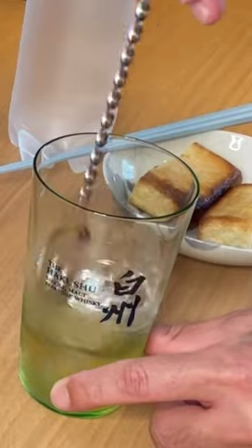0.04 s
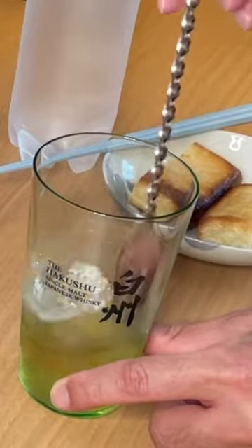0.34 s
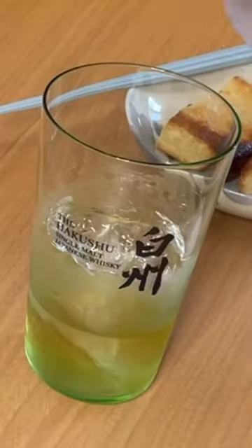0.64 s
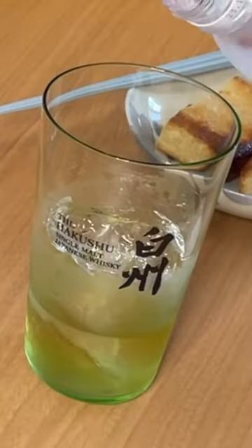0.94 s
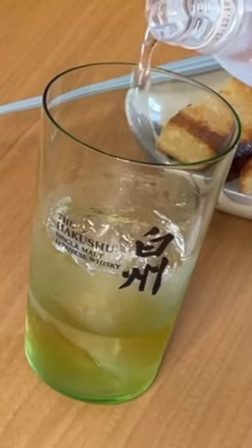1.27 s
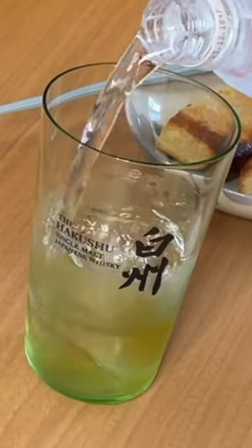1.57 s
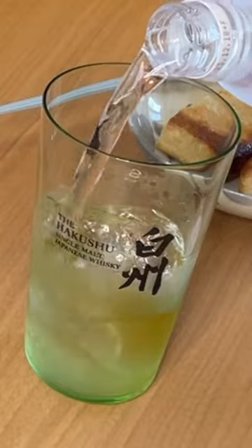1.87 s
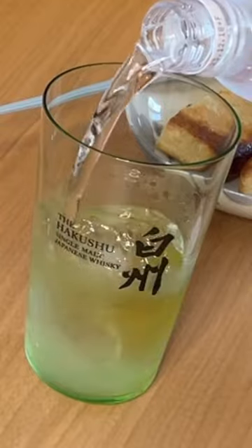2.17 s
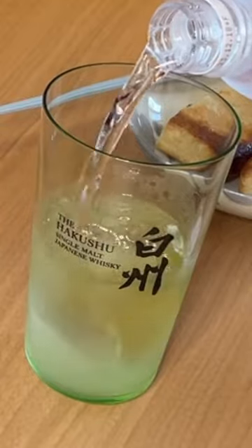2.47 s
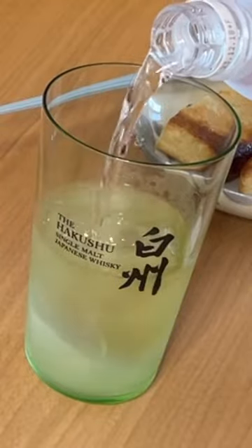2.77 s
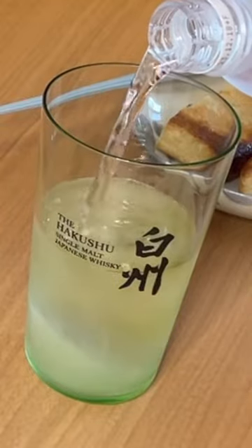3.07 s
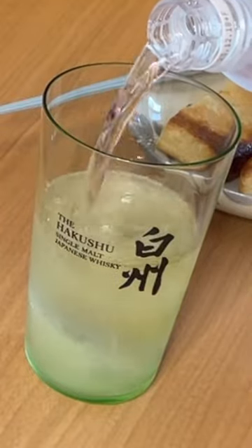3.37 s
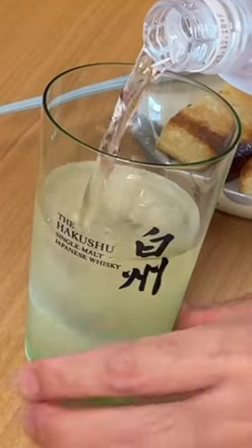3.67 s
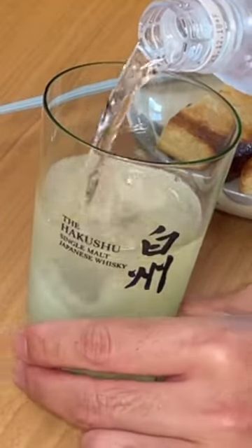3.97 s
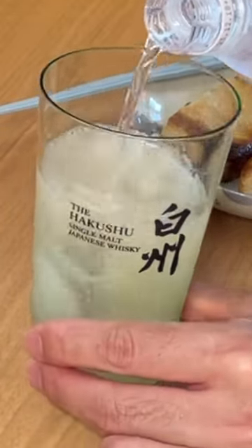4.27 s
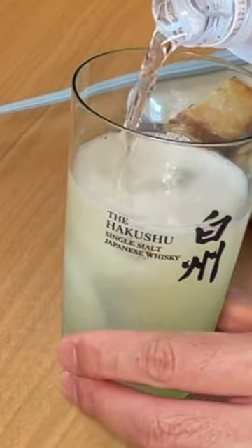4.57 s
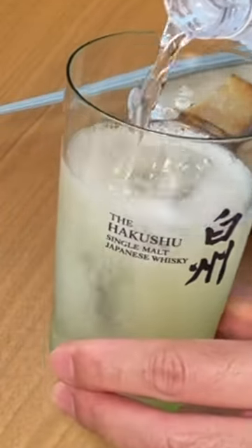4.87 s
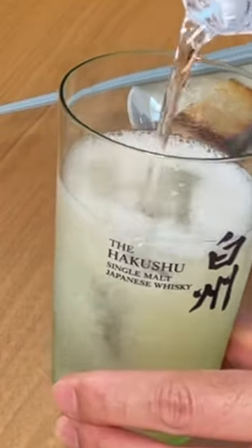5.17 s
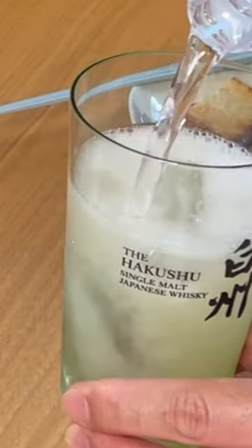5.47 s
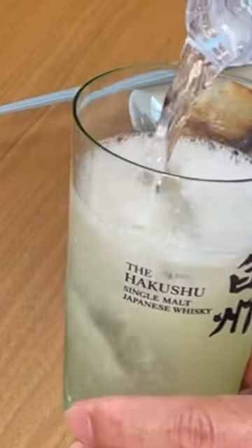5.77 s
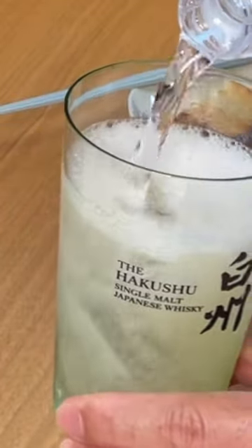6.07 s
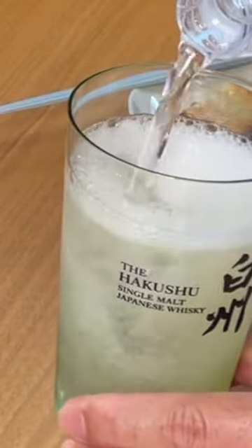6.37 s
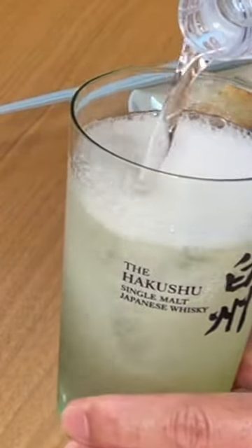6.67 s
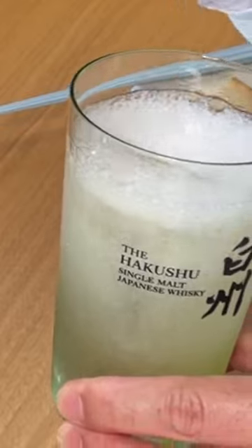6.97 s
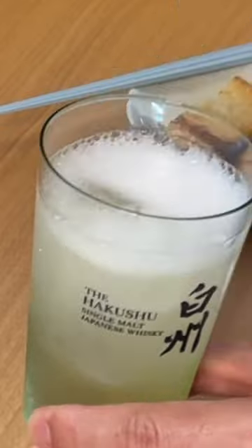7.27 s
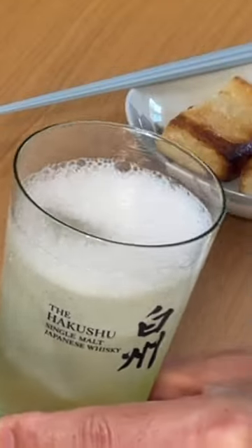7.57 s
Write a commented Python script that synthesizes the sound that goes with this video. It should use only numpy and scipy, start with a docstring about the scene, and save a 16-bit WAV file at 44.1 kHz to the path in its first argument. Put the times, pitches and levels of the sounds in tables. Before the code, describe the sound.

A spoon briefly stirs ice in a glass, then sparkling water pours over crackling, knocking cubes and fizzes before the glass bumps a table.

```python
"""Sparkling water over ice

A bar spoon stirs ice in a tall glass on a wooden table; the stirring is cut off after half a second.
Sparkling water is poured in: droplets trap ringing bubbles, the ice crackles, floats up and knocks on
the wall, and bursting bubbles build a fizzing head of foam. At the end the glass bumps on the table.
A small room, heard closely through two microphone ports."""
import sys
import numpy as np
from scipy import signal
from scipy.fft import rfft, irfft, next_fast_len
from scipy.io import wavfile

SR = 44100
rng = np.random.default_rng(int(sys.argv[2]) if len(sys.argv) > 2 else 0)


def unload_audio(sound):
    """Save the sound as a 16-bit wav file, at the path given as the first command line argument."""
    columns = np.transpose(np.atleast_2d(sound))
    # keep every value between -1 and 1, then stretch to whole-number steps
    steps = np.round(np.clip(columns, -1, 1) * 32767)
    wavfile.write(sys.argv[1], SR, steps.astype(np.int16))


N = 344862
TIME = np.arange(N) / SR
STIR_END_S, POUR_S, POUR_END_S, FLOAT_S = 0.4596, 1.255, 7.0, 4.205  # main cues


# Bright sheen of the spray: (frequency [Hz], relative level [dB])
SPRAY_SPECTRUM = [(3000, -35), (7000, -13), (8200, -2.5), (9300, -3), (11000, -2.5), (12700, -4),
                  (14500, 1), (15600, -2), (16200, -12)]


def fizz():
    """Tiny bursting bubbles throw a bright, sputtering spray and merge into the hiss of foam."""
    spray_gain, foam_gain, per_s = carbonation()
    clusters = coloured(rng.standard_normal(N), [(3, 0), (30, 0), (120, -40), (1000, -100)])
    sputter = amp(clusters * 1.1 * (300 / np.maximum(per_s, 300)) ** 0.39)  # smoother as bursts crowd
    spray = sputter * coloured(grains(per_s, spread_db=0), SPRAY_SPECTRUM)
    return spray_gain * spray + foam_gain * foam(per_s) + pops()


def carbonation():
    """Spray gain, foam gain and bursts a second: the drink settles, the pour frees gas, a head grows."""
    spray_s, head_s, head_grow_s = 2.91, 3.5, 0.83
    flow, gush = stream()
    settling = amp(-86 - 17.5 * since(STIR_END_S))
    bed = np.hypot(settling, flow * amp(-85 + 12.5 * gush))
    spray = ramp(spray_s, length_s=0.76) ** 2 * amp(-67 - 0.5 * since(spray_s))
    head = 1 - np.exp(-since(head_s) / head_grow_s)
    per_s = 400 + 300 * flow + 16000 * head
    return np.hypot(bed, spray), np.hypot(amp(-4.5) * bed, amp(-68) * np.sqrt(head)), per_s


# Body of the foam's hiss: (frequency [Hz], relative level [dB])
FOAM_SPECTRUM = [(500, -12), (1150, -1), (1500, 7), (2000, 2.5), (2400, 2), (2700, -1.5), (4600, -6),
                 (6200, -4), (7500, -2), (8300, 1), (12000, -10), (16000, -20)]
# Two resonances of the air over the foam, sinking as the head thickens and rising as it settles:
# (time [s], lower pitch [Hz], clarity [0-1])
AIR_RING = [(3.3, 3400, 0.05), (4.1, 3484, 0.5), (4.35, 3485, 0.92), (4.65, 3380, 1), (4.95, 3260, 0.8),
            (5.2, 3110, 0.22), (6.2, 3040, 0.28), (6.9, 3086, 0.2), (7.35, 3304, 0.35), (7.8, 3470, 0.3)]
# A ring that emerges with the thick head, sinks, and swells after the pour:
# (time [s], pitch [Hz], relative level [dB])
HEAD_RING_SWEEP = [(4.5, 4700, -25), (5.0, 4410, -7.5), (5.5, 4200, -7), (6.1, 4084, -5), (6.9, 3950, -3.5),
                   (7.15, 3920, -5.5), (7.4, 3770, 1), (7.8, 3690, -2)]


def foam(per_s):
    """Crowded bursts hiss and ring the air over the foam and the full glass."""
    air_hz, clarity = curves(AIR_RING)
    head_hz, head_db = curves(HEAD_RING_SWEEP)
    bursts = grains(per_s, spread_db=-3.5)
    lower = resonate(bursts, air_hz, width_hz=155)
    upper = resonate(bursts, air_hz * 1.55, width_hz=670)
    air = amp(-5.5) * clarity * (lower + amp(1.5) * clarity * upper)
    head = amp(head_db - 6.5) * resonate(bursts, head_hz, width_hz=370)
    wall = amp(-12.5) * resonate(grains(per_s, spread_db=-2), hz=5200, width_hz=320)
    hollow = amp(-14.5) * ramp(FLOAT_S, length_s=0.36) * resonate(bursts, hz=1600, width_hz=170)
    hiss = coloured(grains(per_s, spread_db=3.5), FOAM_SPECTRUM)
    return amp(-2.5 * clarity) * hiss + air + head + wall + hollow  # hiss ducks as the air rings


# The largest bubbles snapping, and at 2.7333 s the bright snap of the loud ice crack: (time [s], relative level
# [dB])
BIG_POPS = [(.632, -66.5), (.8984, -65.5), (.9866, -63.5), (1.3037, -62.5), (1.372, -60), (1.4025, -64.5),
            (1.4305, -54.5), (1.4963, -64), (1.5917, -57.5), (1.6917, -66), (1.852, -61), (1.9684, -60.5),
            (2.2979, -66), (2.3503, -64.5), (2.4383, -61), (2.5399, -63.5), (2.5865, -62), (2.7333, -46.5),
            (2.8363, -55.5), (3.0615, -65), (3.2428, -77), (3.3496, -69), (3.433, -64), (3.4818, -63.5),
            (3.6801, -61), (3.8558, -55.5), (4.0756, -62.5), (5.6692, -58), (5.7467, -59), (6.256, -59.5)]
# Short ring of a snap: (frequency [Hz], relative level [dB], T60 [s])
SNAP_MODES = [(8700, -5, 0.018), (11400, -13, 0.014), (15000, 3.5, 0.016)]


def pops():
    """Large bubbles snap on cue, along with the bright top of the loud crack at 2.73 s; lesser ones at random."""
    times = TIME[rng.random(N) < 4.6 / SR]  # about 4.6 a second
    small_pops = list(zip(times, rng.normal(-68, 3.5, len(times))))
    return blows(BIG_POPS + small_pops, SNAP_MODES, edges_hz=(9500, 16000), detune=0.0685, uneven_db=4,
                 chatter_t60=0.0001, noise_db=1, noise_t60=0.037, trim_db=-3.5)


def stream():
    """How much water is falling (0-1), and its first gush, which dies away."""
    fade_s, gush_s = 0.23, 0.28
    flow = ramp(POUR_S, fade_s) * (1 - ramp(POUR_END_S, fade_s))
    return flow, np.exp(-since(POUR_S + fade_s) / gush_s)


def splash():
    """Until the ice floats, droplets hit it in gurgling clusters and trap small, chirping bubbles."""
    droplets_per_s, pitches, decay_cycles = 800, 40, 4
    flow, gush = stream()
    gurgle = coloured(rng.standard_normal(N), [(10, 0), (100, -100)])
    t, out = TIME[:SR // 30], np.zeros(N)
    lands = rng.random(N) < droplets_per_s / SR
    pitch_index = rng.integers(0, pitches, N)
    sizes = amp(3 * np.minimum(rng.exponential(1, N), 3) + 9 * np.minimum(gurgle, 2))
    for k, hz in enumerate(np.geomspace(2200, 10000, pitches)):
        age = hz * t / decay_cycles
        envelope = np.exp(-age) * (1 - np.exp(-5 * age))
        bubble = envelope * np.sin(2 * np.pi * hz * t * (1 + 0.0092 * age))
        for index in np.flatnonzero(lands & (pitch_index == k)):
            add(out, index / SR, sizes[index] * bubble * (hz / 5000) ** 1.3)
    return flow * (1 - afloat()) * amp(-83.5 - 4 * gush) * unit(out)


# Plinks in the pour: ringing bubbles and, near 4.7 kHz, the glass ticked by ice:
# (time [s], relative level [dB], pitch [Hz])
POUR_PLINKS = [(1.524, -65, 4720), (1.653, -57.5, 4670), (1.7307, -66.5, 6180), (1.8096, -57, 2620),
               (1.885, -56.5, 5240), (1.9181, -57.5, 2510), (1.9325, -56.5, 2518), (1.9813, -69, 4680),
               (2.0607, -67.5, 2250), (2.135, -65, 2610), (2.1622, -62.5, 2790), (2.3923, -67.5, 2230),
               (2.5027, -62.5, 4700), (2.531, -58.5, 5310), (2.584, -59, 3223), (2.6297, -59.5, 2940),
               (2.7024, -55, 5320), (3.153, -67.5, 3340), (3.3138, -62, 4240), (3.3668, -64, 3400),
               (3.4695, -62, 3290)]


def plinks():
    """A bubble or the ticked glass rings briefly, rising a little, inside a soft swarm of tiny rings."""
    t, out = TIME[:SR // 12], np.zeros(N)
    for s, db, hz in POUR_PLINKS:
        ring = np.sin(2 * np.pi * hz * t * (1 + 0.69 * t)) * decay(t, t60=0.03)
        swarm = flurry(hz, octaves=0.32, length_s=0.038, fade_db=-13.5, cycles=6.6)
        add(out, s, amp(db - 2) * np.tanh(t / 0.001) * ring)
        add(out, s - 0.004, amp(db - 12.5) * np.tanh(t / 0.0058) * swarm)
    return out


# Cubes hitting the wall and each other: (time [s], relative level [dB], clack over body [dB])
ICE_KNOCKS = [(0.0141, -33, -33), (0.053, -32, -8), (0.066, -31.5, -26), (0.132, -35, -20),
              (0.1397, -31, -5), (0.1672, -36, -4), (0.1814, -32.5, -10), (0.2134, -34.5, -4),
              (.24, -35, -15), (0.2587, -32.5, -5.5), (.3059, -24.5, -1), (0.3229, -39.5, 8),
              (0.3698, -43, 10), (0.3963, -33.5, -5), (2.541, -66, -19), (2.6147, -58, -13.5),
              (2.7263, -51.5, -7), (2.788, -61.5, -15), (2.7955, -53.5, -27), (3.4007, -61.5, -23),
              (3.425, -65, -21.5), (3.6962, -60, -22), (3.7657, -64, -20), (3.8213, -50, -18.5),
              (3.8591, -62.5, -20), (3.8777, -65, -24.5), (3.9449, -65, -17), (3.9807, -64, -13),
              (4.1068, -59, -19.5), (4.167, -48, -8), (4.194, -55, -20), (4.2233, -50, -21),
              (4.2796, -49.5, -29), (4.297, -53, -17), (4.3443, -45, -13), (4.4477, -57.5, -16),
              (4.521, -62, -13), (4.575, -46.5, -6.5), (4.586, -54, -3.5), (4.6198, -54, -18),
              (4.662, -50.5, -6), (4.7745, -50, -18), (4.809, -59, -18.5), (4.976, -55.5, -13),
              (5.0049, -50.5, -19), (5.2878, -59.5, -17.5), (5.3621, -54, -3.5), (5.438, -61, -14.5),
              (5.4573, -55.5, -20.5), (5.4852, -49, -15.5), (5.633, -59, -25.5), (5.735, -54, -21.5),
              (5.9936, -53.5, -8.5), (6.2053, -40, -19), (6.3336, -51, -18.5), (6.3535, -51, -23),
              (6.3843, -54.5, -19), (6.617, -57, -24.5), (6.8017, -48.5, -13.5), (7.2017, -58, -11),
              (7.5065, -49.5, -11)]
# Damped ring of ice against the filled glass: (frequency [Hz], relative level [dB], T60 [s])
ICE_MODES = [(300, -9, 0.055), (563.8, -5, 0.04), (772, -1, 0.033), (979.4, -0.5, 0.033), (1153, -1, 0.026),
             (1430, 7, 0.025), (1550, 1, 0.02), (1760, -6, 0.022), (2214, -8.5, 0.024), (2730, -9, 0.022),
             (3240, -14, 0.02)]


def knocks():
    """Stirred cubes clack in the low drink; in the pour they boom on the bottom, then thin out afloat."""
    rebounds = [(s + 0.018 * rng.uniform(0.5, 1.5), db - 15, clack) for s, db, clack in ICE_KNOCKS]
    s, db, clack_db = np.transpose(ICE_KNOCKS + rebounds)
    stirred = s < STIR_END_S
    floating_db = -3 - 3 * since(FLOAT_S, s)
    boom_db = np.where(stirred, -2, 8 * (1 - afloat(s)) + floating_db * afloat(s))
    snap_db = np.where(stirred, -17.5, -10)
    edges_hz = (230, 1100, 2000, 3400, 7000)  # boom, body, clack, snap
    hits = np.column_stack([s, db + boom_db, db, db + clack_db, db + clack_db + snap_db])
    # a knock rings the low drink's resonances, brighter than churning does
    shallow_modes = [(hz, level + 3.5 * np.log2(hz / 1000), 0.73 * np.log(1000) / (np.pi * width))
                     for hz, width, level in DRINK_RESONANCES]
    clacks = blows(hits[stirred], shallow_modes, edges_hz, detune=0.03, uneven_db=4.5,
                   chatter_t60=0.001, noise_db=-4, noise_t60=0.025, trim_db=-3, rise_s=0.0011)
    clunks = blows(hits[~stirred], ICE_MODES, edges_hz, detune=0.035, uneven_db=4,
                   chatter_t60=0.00078, noise_db=-4.5, noise_t60=0.048, trim_db=-3, rise_s=0.0007)
    return clacks + clunks


def afloat(s=TIME, lift_s=0.36):
    """0 while the cubes rest on the bottom, 1 once they float."""
    return ramp(FLOAT_S - lift_s / 2, lift_s, s)


# Ice splitting under spoon and stream: (time [s], relative level [dB], pitch [Hz], spread [octaves])
ICE_CRACKS = [(0.141, -38, 3520, .25), (.205, -42, 3960, .2), (0.215, -41, 4340, .3), (.272, -37, 4390, .3),
              (0.3699, -37, 3314, .4), (0.404, -39, 3100, .4), (1.43, -58.5, 4894, 0.11),
              (1.5033, -64, 7020, 0.62), (1.567, -45.5, 4900, .13), (1.567, -57, 8000, .3),
              (1.584, -55.5, 4610, 0.18), (1.6, -62, 5370, 0.51), (1.69, -60.5, 7800, 0.34),
              (1.8104, -60, 5610, 0.37), (1.9328, -63.5, 4520, 0.64), (2.733, -51, 6800, .9),
              (4.167, -55.5, 5020, .4)]


def cracks():
    """Each crack runs on in ever weaker snaps around its own pitch."""
    out = np.zeros(N)
    for s, db, hz, octaves in ICE_CRACKS:
        add(out, s, amp(db - 5.5) * flurry(hz, octaves, length_s=0.056, fade_db=-21.5, cycles=11))
    return out


# Dull EQ of ice rubbing on ice: (frequency [Hz], gain [dB])
GRIND_EQ = [(200, 5), (450, 4), (900, 2.5), (1450, -3.5), (2000, -22), (3500, -20)]


def grinding():
    """Cubes grind in the pour: after each knock, all through lifting off, and faintly once afloat."""
    slips = struck(grains(450, spread_db=2.5), ICE_MODES, ring_samples=SR // 40)
    lifting = amp(8.5) * np.exp(-((TIME - FLOAT_S) / 0.36) ** 2)
    flow, _ = stream()
    jostle = amp(-79) * (lifting + afloat() * flow)
    scuffs = np.zeros(N)
    for s, db, _ in ICE_KNOCKS:
        if s > STIR_END_S:
            add(scuffs, s, amp(db - 8 - 14 * afloat(s)) * decay(TIME[:SR // 3], t60=0.25))
    return (jostle + scuffs) * coloured(slips, GRIND_EQ)


# Push of the stirring hand: (time [s], relative level [dB])
STIR_EFFORT = [(0.0, -35), (0.08, -37.5), (0.116, -47.5), (0.138, -37), (0.334, -34), (0.45, -37)]
# Voice of the low drink and its ice: (frequency [Hz], width [Hz], relative level [dB])
DRINK_RESONANCES = [(134.8, 18, 0.5), (199, 22, -5), (296.3, 25, -3), (536, 50, -7.5), (820, 45, -9),
                    (962, 55, -4.5), (1061.3, 66, -10), (1230, 130, -9), (1780, 80, -3), (1896, 100, -7),
                    (2035, 70, -6), (2755, 45, -11), (2990, 190, -17.5), (3540, 270, -21)]


def stirring():
    """Ice churns in the drink while the spoon ticks and scrapes along the cubes."""
    effort_db, = curves(STIR_EFFORT)
    jostle = grains(1500, spread_db=4)
    churn = unit(sum(amp(db) * resonate(jostle, hz, width) for hz, width, db in DRINK_RESONANCES))
    slips = grains(260, spread_db=2.5)
    ticks = struck(slips, SPOON_MODES, ring_samples=SR // 20)
    scrape_eq = [(1000, -3), (3000, -3.5), (5200, -2.5), (7000, -9.5), (12000, -13), (15000, -9)]
    scrape = coloured(slips, scrape_eq)
    return amp(effort_db) * (amp(-1.17) * churn + amp(-11.5) * ticks + amp(-19) * scrape)


# Spoon on glass, with relative levels in three bands:
# (time [s], near 5 kHz [dB], near 8 kHz [dB], near 14 kHz [dB], ring over clatter [dB])
SPOON_TAPS = [(0.0233, -27, -30, -30.5, -7.5), (0.0264, -21, -22.5, -25, 4), (0.0471, -30, -17, -22, -2.5),
              (0.0571, -33.5, -31.5, -41.5, -4), (.127, -40.5, -39.5, -42.5, -17.5),
              (.258, -39, -32.5, -31, -13), (0.267, -36.5, -25.5, -29, -7), (.3225, -33.5, -31, -39, -11.5),
              (0.3693, -39, -34.5, -50, -14), (0.4146, -23, -21.5, -25, -19),
              (0.4293, -33, -25, -25.5, -14.5)]
# Clatter of the spoon, damped by the drink: (frequency [Hz], relative level [dB], T60 [s])
SPOON_MODES = [(4787, -7.5, 0.034), (5010, 0, 0.027), (5526, -0.5, 0.047), (5844, -4.5, 0.032),
               (7120, -6.5, 0.021), (7680, 1.5, .04), (8000, 0, 0.037), (9700, -10.5, .03),
               (10650, -8, .04), (11280, -11.5, .04), (12600, -10, 0.052), (13700, -9.5, 0.043),
               (14440, 0.5, 0.063), (14300, -3, .05), (15280, -8.5, .04)]
# Ring of the glass wall: (frequency [Hz], relative level [dB], T60 [s])
GLASS_MODES = [(4580, -5, .075), (4613, -2, .07), (5515, -2, 0.069), (7910, -4.5, 0.086), (7760, -5, .09),
               (8200, -8, 0.056), (9780, -9, 0.13), (9500, -7, 0.14), (10700, -12.5, 0.13),
               (11600, -11.5, 0.055), (13840, -12.5, .08), (14070, -5.5, .11), (14480, -2.5, .09)]


def clinks():
    """Each tap is a short metallic clatter; only a square hit makes the glass ring on."""
    edges_hz = (4100, 6500, 10000, 16000)
    spoon_hits = [tap[:4] for tap in SPOON_TAPS]
    glass_hits = [(s, low + ring, mid + ring, high + ring - 4) for s, low, mid, high, ring in SPOON_TAPS]
    doubled_modes = SPOON_MODES + SPOON_MODES  # each copy detunes on its own
    spoon = blows(spoon_hits, doubled_modes, edges_hz, detune=0.02, uneven_db=3,
                  chatter_t60=0.0001, noise_db=-2, noise_t60=0.059, trim_db=-0.5, rise_s=0.0014)
    glass = blows(glass_hits, GLASS_MODES, edges_hz, detune=0.0012, uneven_db=1.5,
                  chatter_t60=0.0001, noise_db=-13.5, noise_t60=0.036, trim_db=0.5, rise_s=0.0018)
    return spoon + glass


# The glass meeting the table: (time [s], relative thud level [dB], relative tick level [dB])
TABLE_BUMPS = [(7.5553, -27, -40), (7.6917, -49, -48)]
# Woody notes of the table top: (frequency [Hz], relative level [dB], T60 [s])
TABLE_MODES = [(123.4, -6, 0.29), (204, -13.5, 0.38), (277, 1, 0.092), (436, -4, 0.079), (604, -2, 0.086),
               (834, 7.5, 0.024), (1234, 1.5, 0.025), (4200, -31, 0.11), (6100, -38, .1)]
# The table's dense ring: (frequency [Hz], relative level [dB])
THUD_SPECTRUM = [(60, -2.5), (130, 3.5), (300, -1.5), (600, -8), (1400, -16), (2200, -31), (4200, -35),
                 (7000, -59), (12000, -60)]
# First touch of glass on wood: (frequency [Hz], relative level [dB])
TICK_SPECTRUM = [(300, -23), (1200, 5), (3500, 0.5), (5000, -13), (7000, -13), (12000, -29)]


def bump():
    """The heavy base strikes the table: a hard tick, a few strong modes and a dense, dull ring."""
    t, out = TIME[:SR // 2], np.zeros(N)
    thud_fade = decay(t, t60=0.12) + amp(-16) * decay(t, t60=0.4)
    attack = np.tanh(t / 0.00086) ** 2
    for s, thud_db, tick_db in TABLE_BUMPS:
        dense = coloured(rng.standard_normal(N), THUD_SPECTRUM)[:len(t)] * thud_fade
        tick = coloured(rng.standard_normal(N), TICK_SPECTRUM)[:len(t)] * decay(t, t60=0.018)
        add(out, s, amp(thud_db) * attack * (ringing(TABLE_MODES, t) + dense) + amp(tick_db) * tick)
    return out


# Length of the room's tail: (frequency [Hz], T60 [s])
REVERB_TIME = [(150, 1.31), (1000, 0.78), (5000, 0.2273), (15000, 0.01)]
# Wet against dry: (frequency [Hz], level [dB])
REVERB_LEVEL = [(150, -13), (600, -3), (1800, -6), (5000, -8), (14000, -21.5)]


def room(x):
    """Direct sound plus sparse reflections, different at each port, that die faster in the treble."""
    taps = rng.choice([-1., 1.], (2, SR // 2)) * (rng.random((2, SR // 2)) < 3000 / SR)
    taps[:, :SR // 200] = 0  # 5 ms pre-delay
    hz, t, bands = signal.stft(taps / np.std(taps), SR, nperseg=256)
    t60 = at_hz(REVERB_TIME, hz)[:, None]
    tail = decay(t, t60) * np.sqrt(np.log(10 ** 6) / (t60 * SR))  # unit energy in each band
    bands *= amp(at_hz(REVERB_LEVEL, hz))[:, None] * tail
    _, response = signal.istft(bands, SR, nperseg=256)
    return x + signal.fftconvolve(x[None], response, axes=1)[:, :N]


# Low indoor bed: (frequency [Hz], relative level [dB])
RUMBLE_SPECTRUM = [(20, -22), (36, -12), (54, 6), (85, -3.5), (130, -7), (200, -14), (400, -23.5),
                   (850, -23.5), (1300, -31.5), (2000, -45.5), (3500, -54), (16000, -57.5)]


def room_tone():
    """A low indoor rumble, nearly alike at both ports."""
    common, left, right = (coloured(n, RUMBLE_SPECTRUM) for n in rng.standard_normal((3, N)))
    return amp(-55.5) * (common + amp(-6.5) * np.array([left, right]))


def blows(hits, modes, edges_hz, detune, uneven_db, chatter_t60, noise_db, noise_t60, trim_db, rise_s=0):
    """Brief contacts ring the modes and add a noise burst; a hit is (time [s], level per band [dB])."""
    t, out = TIME[:SR // 7], np.zeros(N)
    attack_samples = round(0.012 * SR)
    bands = [signal.butter(3, pair, "bandpass", fs=SR, output="sos")
             for pair in zip(edges_hz, edges_hz[1:])]
    for s, *levels in hits:
        chatter, noise = rng.standard_normal((2, len(t)))
        contact = (1 + chatter / 2) * decay(t, chatter_t60)
        contact /= np.linalg.norm(contact)
        ring = signal.fftconvolve(contact, ringing(modes, t, detune, uneven_db))[:len(t)]
        hit = (ring + amp(noise_db) * noise * decay(t, noise_t60)) * np.tanh(t / (rise_s + 1e-9))
        for band, db in zip(bands, levels):
            part = signal.sosfilt(band, hit)
            add(out, s, amp(db + trim_db) * part / np.std(part[:attack_samples]))
    return out


def ringing(modes, t, detune=0, uneven_db=0):
    """Decaying modes; a blow that lands elsewhere can shift their pitch and strength a little."""
    hz, db, t60 = np.transpose(modes)[:, :, None]
    shift, share = rng.standard_normal((2, len(modes), 1))
    tones = np.sin(2 * np.pi * hz * (1 + detune * shift) * t)
    return (amp(db + uneven_db * share) * decay(t, t60) * tones).sum(0)


def struck(clicks, modes, ring_samples):
    """Modes rung by a train of clicks, at rms 1."""
    return unit(signal.oaconvolve(clicks, ringing(modes, TIME[:ring_samples]))[:N])


def flurry(hz, octaves, length_s, fade_db, cycles, count=40):
    """Tiny rings around a pitch, crowded at first, then sparser and weaker; rms 1 over the attack."""
    t, order = TIME[:SR // 12], np.linspace(0, 1, count)[:, None]
    lag, pitch, size = rng.uniform(-1, 1, (3, count, 1))
    onsets = length_s * order ** 2 * (1 + lag / 10)
    age = since(onsets, t) * hz * 2 ** (octaves * pitch)  # in cycles
    rings = np.sin(2 * np.pi * age) * np.exp(-age / cycles) * np.tanh(age)
    sound = (size * amp(fade_db * order) * rings).sum(0)
    return sound / np.std(sound[:SR // 80])


def grains(per_s, spread_db):
    """Random clicks of scattered size, with the same mean power at any rate."""
    size = amp(spread_db * np.minimum(rng.exponential(1, N), 4))
    return unit(size * rng.choice([-1, 1], N) * (rng.random(N) < per_s / SR) / np.sqrt(per_s))


def resonate(x, hz, width_hz):
    """A steep resonance that can follow a pitch curve, at rms 1."""
    carrier = np.exp(2j * np.pi * np.cumsum(hz * np.ones(N)) / SR)
    pole = np.exp(-2 * np.pi * width_hz / SR)
    return unit((carrier * signal.lfilter([1], [1, -2 * pole, pole * pole], x / carrier + 1e-18)).real)


def coloured(x, spectrum):
    """EQs a steady sound by (frequency [Hz], gain [dB]) points, at rms 1."""
    return unit(irfft(rfft(x) * amp(at_hz(spectrum, np.fft.rfftfreq(N, 1 / SR))), N))


def at_hz(points, hz):
    """Reads a spectrum on a log-frequency axis."""
    f, value = np.transpose(points)
    return np.interp(np.log(hz + 1), np.log(f + 1), value)


def curves(rows):
    """The columns of a control table at every sample."""
    s, *columns = np.transpose(rows)
    return [np.interp(TIME, s, c) for c in columns]


def ramp(start_s, length_s, s=TIME):
    """Rises evenly from 0 to 1."""
    return np.clip((s - start_s) / length_s, 0, 1)


def since(start_s, s=TIME):
    """Seconds after a cue, 0 before it."""
    return np.maximum(s - start_s, 0)


def decay(t, t60):
    """Falls by 60 dB in t60 seconds."""
    return amp(-60 * t / t60)


def amp(db):
    """Decibels to gain."""
    return np.exp(np.asarray(db) * (np.log(10) / 20))


def unit(x):
    """Scales to rms 1."""
    return x / np.sqrt(np.mean(x ** 2) + 1e-24)


def add(mix, s, sound):
    """Mixes a sound in at a time."""
    part = mix[max(round(s * SR), 0):][:len(sound)]
    part += sound[:len(part)]


def scene():
    """The stirring stops abruptly, leaving a faint dull echo; the pour follows, then a mostly dry bump."""
    stir_gate = np.clip((STIR_END_S - TIME) / 0.0097 + 0.5, 0, 1)
    ice = cracks() + knocks() + grinding()
    thump = bump()
    stirred = room(stir_gate * (stirring() + clinks() + ice))
    echo = amp(-20) * signal.sosfilt(signal.butter(4, 2400, fs=SR, output="sos"), stirred)
    poured = room((1 - stir_gate) * (ice + splash() + plinks() + fizz() + 0.36 * thump))
    return stir_gate * stirred + (1 - stir_gate) * echo + poured + 0.65 * thump + room_tone()


# Phase between the microphone ports: (frequency [Hz], lead of the left [rad])
STEREO_PHASE = [(300, 0), (700, -.8), (1900, -.2), (2900, .5), (5300, .3), (5800, -1.7), (6500, -1.1),
                (7650, -3.14), (9400, -3.14), (12550, -6.28)]
# Balance between the ports: (frequency [Hz], left minus right [dB])
STEREO_BALANCE = [(150, 4), (700, 0.5), (1500, 4), (4400, 3.5), (8200, 0.57), (14000, 0.5)]


def record(dry):
    """The two ports differ in level and phase; a steep low-pass takes off the very top."""
    size = next_fast_len(N + SR // 10)
    hz = np.fft.rfftfreq(size, 1 / SR)
    lean = amp(at_hz(STEREO_BALANCE, hz) / 2)
    ports = np.array([lean, np.exp(-1j * at_hz(STEREO_PHASE, hz)) / lean])
    heard = irfft(rfft(dry, size) * ports, size)[:, :N]
    lowpass = signal.firwin(511, cutoff=15900, window=("kaiser", 9), fs=SR)
    return signal.oaconvolve(heard, lowpass[None], "same")


dry = scene()
out = record(dry)
unload_audio(out)
```